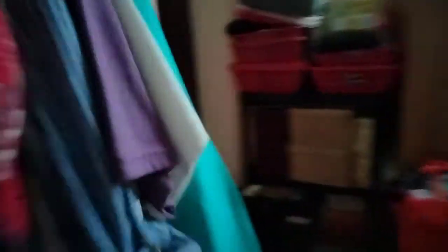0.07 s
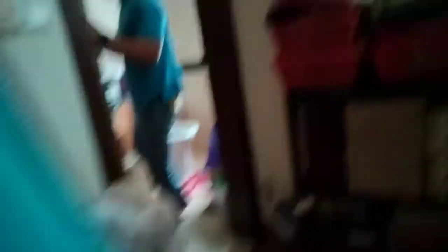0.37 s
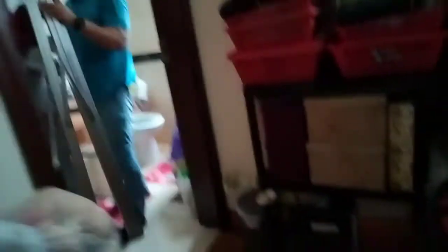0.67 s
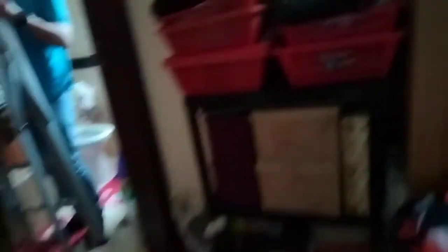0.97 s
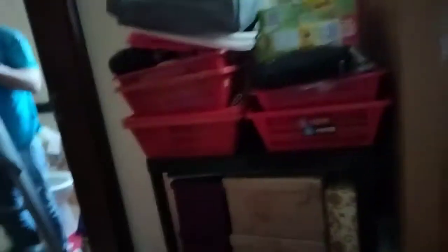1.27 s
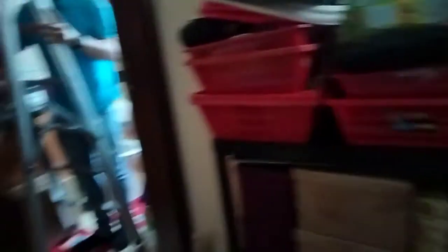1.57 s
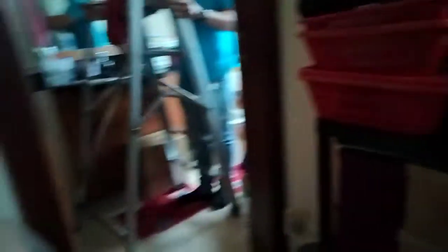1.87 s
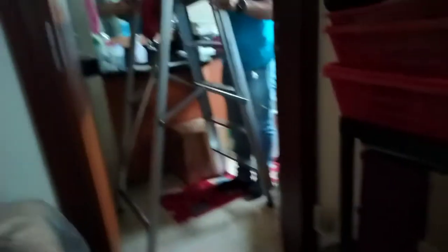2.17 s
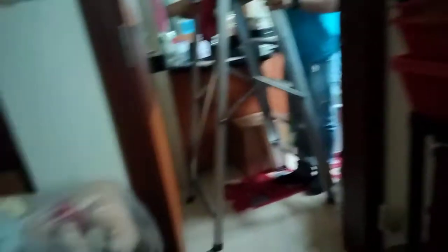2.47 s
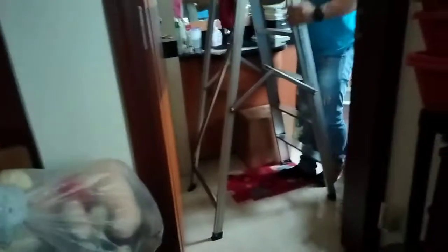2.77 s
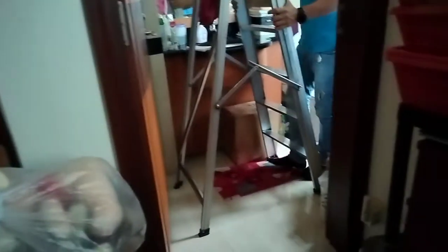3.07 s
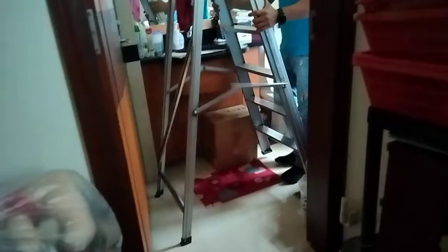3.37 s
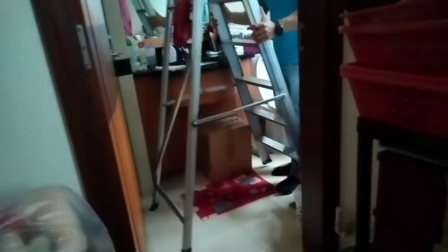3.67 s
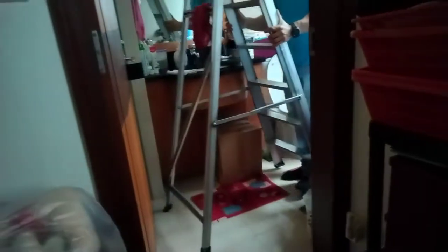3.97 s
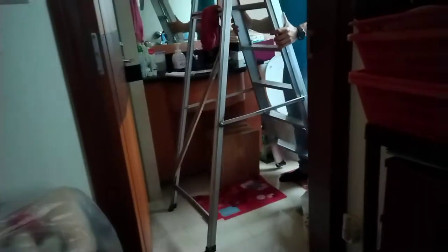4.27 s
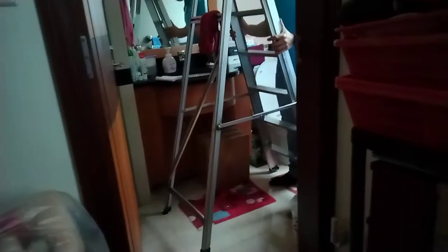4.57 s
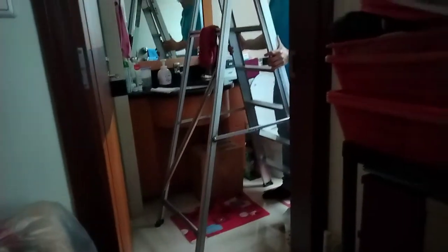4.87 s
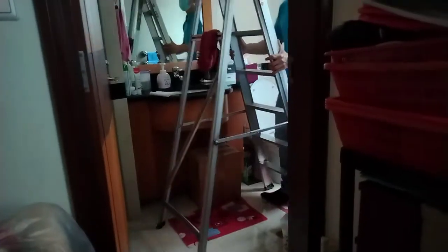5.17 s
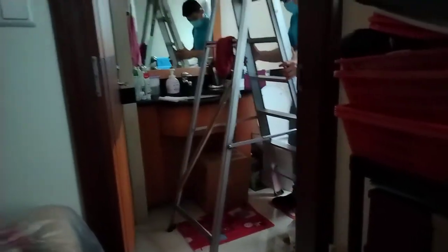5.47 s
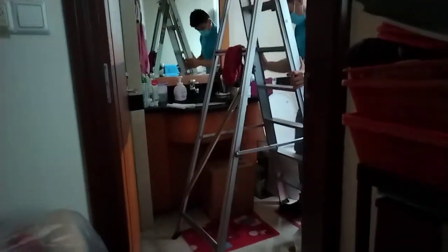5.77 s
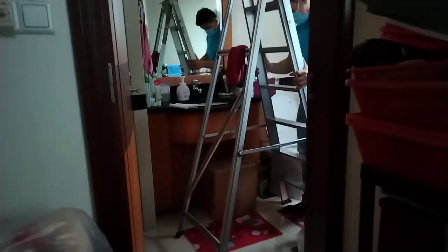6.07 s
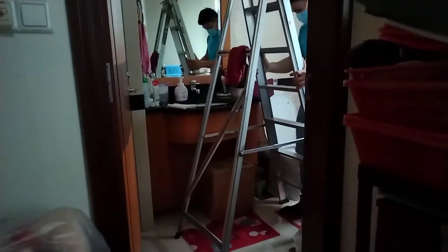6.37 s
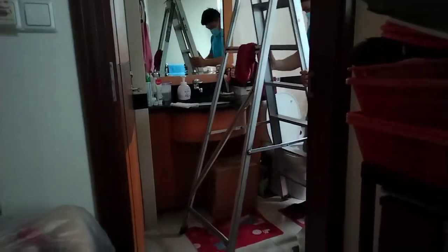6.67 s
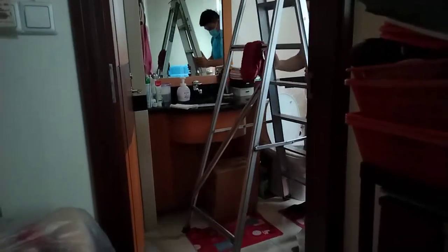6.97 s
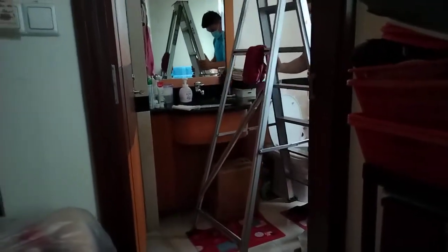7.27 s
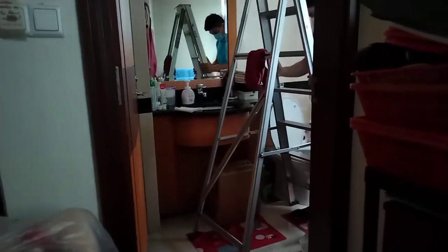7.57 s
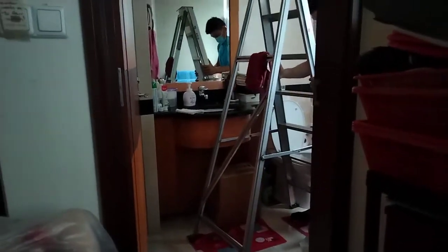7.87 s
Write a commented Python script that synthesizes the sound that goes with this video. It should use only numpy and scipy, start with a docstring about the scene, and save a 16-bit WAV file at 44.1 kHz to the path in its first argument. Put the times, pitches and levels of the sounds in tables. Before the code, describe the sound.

Inside a home with small, hard rooms, a stepladder is moved and stood up, heard through a phone in the next room. Faint finger ticks on the phone and light metal knocks come first, over a soft hiss. A loud clank and a louder burst of clattering follow, with a quiet low rush beneath. Then the ladder is nudged about in scattered knocks, each a short rattle of loose joints that rings the hollow rails.

```python
"""Over a soft household hiss, an aluminium stepladder knocks lightly as it is carried through a doorway.
Fingers tick on the phone that listens from the next room. Near 2 s a hollow low rush swells and the
ladder is set on a tiled floor; at 3.5 s it is spread open with a loud clatter. The rush dies after 4 s,
then a thin whine comes and goes while the ladder is shifted into place. Each knock is a short rattle
of loose joints that rings the hollow rails; small hard rooms smear it."""
import sys
import numpy as np
from scipy import signal
from scipy.fft import rfft, irfft
from scipy.io import wavfile

SR = 44100
rng = np.random.default_rng(int(sys.argv[2]) if len(sys.argv) > 2 else 0)


def store_wav(level_fs):
    """Save 16-bit WAV to argv[1]."""
    pcm = np.round(np.clip(np.atleast_2d(level_fs), -1, 1) * 32767)
    wavfile.write(sys.argv[1], SR, pcm.T.astype(np.int16))


N = 353108
TAIL = 24576  # samples per knock or tick
TIME_S, AGE_S = np.arange(N) / SR, np.arange(TAIL) / SR


def undb(db):
    """Decibels to gain."""
    return 10 ** (np.asarray(db) / 20)


def unit(x):
    """Scale to an energy of one."""
    return x / np.sqrt(np.sum(x ** 2) + 1e-18)


def fade(t60_s):
    """Exponential decay, 60 dB in t60_s."""
    return np.exp(-np.log(1000) * AGE_S / max(t60_s, 1e-3))


def convolve(x, response):
    """Pass a sound through an impulse response."""
    return signal.fftconvolve(x, response)[:len(x)]


def butter(x, order, hz, kind="low"):
    """Butterworth filter."""
    return signal.sosfilt(signal.butter(order, hz, kind, fs=SR, output="sos"), x)


def colour(x, points, size=4096):
    """Minimum-phase filter with the gain of (Hz, dB) points."""
    hz, db = np.transpose(points)
    bin_hz = np.fft.rfftfreq(size, 1 / SR)
    gain = undb(np.interp(np.log(bin_hz + 1), np.log(hz), db))
    cepstrum = irfft(np.log(gain))
    cepstrum[1:size // 2] *= 2
    cepstrum[size // 2 + 1:] = 0
    return convolve(x, irfft(np.exp(rfft(cepstrum))))


def waver(depth_db, rate_hz):
    """Gain that wanders randomly about one."""
    steps = rng.standard_normal(1024)
    return undb(depth_db * np.interp(TIME_S * rate_hz, np.arange(len(steps)), steps))


def noise(points):
    """Coloured noise with an rms of one."""
    return unit(colour(rng.standard_normal(N), points)) * np.sqrt(N)


def add(out, start_s, sound):
    """Mix a sound in at a time."""
    start = max(int(start_s * SR), 0)
    out[start:start + len(sound)] += sound[:max(len(out) - start, 0)]


def thin_hiss(start_db=-53.5, db_per_s=-1.5):
    """White hiss close to the microphone, sinking slowly."""
    return undb(start_db + db_per_s * TIME_S) * rng.standard_normal(N)


# Each row: frequency in Hz, relative level in dB.
HISS_SPECTRUM = [(25, -31), (70, -10.5), (200, -1), (450, 1), (700, 1.5), (1300, 3), (2000, 4),
                 (3200, -1.5), (5000, -7.5), (8000, -16.5), (16000, -17.5)]
# Each row: time in seconds, hiss level in dB.
HISS_ENVELOPE = [(0, -44.5), (.55, -54), (.8, -46), (1.2, -47.5), (2.1, -56.5), (2.38, -54), (2.62, -44.5),
                 (4.15, -44), (4.6, -48), (5.4, -44.5), (6.1, -48), (7.5, -46.5), (7.85, -52)]


def household_hiss():
    """Soft broad noise with a wavering level."""
    level_db = np.interp(TIME_S, *np.transpose(HISS_ENVELOPE))
    return noise(HISS_SPECTRUM) * undb(level_db) * waver(depth_db=0.74, rate_hz=27)


# Each row: peak time in seconds, level in dB, 1/e half-width in seconds.
WHINE_SWELLS = [(4.476, -52.5, 0.1), (5.779, -52.5, 0.096), (6.3, -46.5, 0.08), (7.033, -54, .1)]


def whine(hz=1930):
    """A narrow band of noise in brief swells."""
    band = noise([(hz * .8, -35), (hz * .94, -9), (hz, 0), (hz * 1.06, -9), (hz * 1.25, -35)])
    swells = sum(undb(db) * np.exp(-((TIME_S - peak_s) / half_s) ** 2)
                 for peak_s, db, half_s in WHINE_SWELLS)
    return band * swells * waver(depth_db=1, rate_hz=11)


# Each row: frequency in Hz, relative level in dB.
RUSH_SPECTRUM = [(40, -40.5), (160, -16.5), (250, -2.5), (400, -1), (540, 1), (640, -4.5), (1000, -15.5),
                 (3000, -43.5)]


def hollow_rush(full_db=-45, full_s=1.91, end_s=4.07, rise_db_per_s=10.5, fall_db_per_s=57.5):
    """Low noise that swells, holds and stops."""
    rise_db = rise_db_per_s * np.minimum(TIME_S - full_s, 0)
    fall_db = fall_db_per_s * np.maximum(TIME_S - end_s, 0)
    return noise(RUSH_SPECTRUM) * undb(full_db + rise_db - fall_db)


# Each row: start in seconds, relative level in dB, t60 in seconds.
FINGER_TICKS = [(0.205, -48, .017), (0.488, -40.5, 0.011), (2.155, -52.5, .12), (2.81, -50, .9)]


def fingers(top_hz=5000):
    """Fingers tick and brush on the phone's case."""
    out = np.zeros(N)
    for start_s, db, t60_s in FINGER_TICKS:
        add(out, start_s, undb(db) * fade(t60_s) * rng.standard_normal(TAIL))
    return 2 * butter(out, 1, top_hz)


def rattle(length_s, first_db, scatter_db=2.5, count=7):
    """Energy of a first contact and of the uneven strikes that close the play in the joints."""
    strikes = np.zeros(TAIL)
    when_s = length_s * (np.arange(count) + rng.random(count)) / count
    energies = undb(scatter_db * rng.standard_normal(count)) ** 2
    np.add.at(strikes, (when_s * SR).astype(int) + 1, energies)
    strikes[0] = undb(first_db) ** 2
    return strikes / strikes.sum()


def wash(strikes, response, grain_db=0):
    """Each strike hits a new spot, so responses add in energy; grain makes single echoes stand out."""
    energy = np.maximum(convolve(strikes, unit(response) ** 2), 0)
    grain = undb(grain_db * np.repeat(rng.standard_normal(TAIL // 32), 32))
    return unit(np.sqrt(energy) * grain * rng.standard_normal(TAIL))


def clatter(strikes, crack_db=-6, late_db=-25, build_s=0.0059, split_hz=3800):
    """A crack per strike, close reflections off tiles, a dull late tail from the rest of the home."""
    build = 1 - np.exp(-AGE_S / build_s)
    late = undb(late_db) * fade(t60_s=0.91)
    low = wash(strikes, build * (fade(t60_s=0.34) + late), grain_db=0.75)
    high = wash(strikes, build * fade(t60_s=0.15), grain_db=1.5)
    crack = undb(crack_db) * wash(strikes, fade(t60_s=0.028))
    return butter(low, 2, split_hz) + butter(high, 2, split_hz, "high") + crack


def ripple(x, spread_db=3, count=90):
    """The struck spot and the nearest walls give each knock its own peaks and dips."""
    hz = np.linspace(150, 12000, count)
    return colour(x, np.transpose([hz, spread_db * rng.standard_normal(count)]))


def thin_walls(t60_s=0.25, low_hz=1000, high_hz=11000, count=70):
    """Modes of the steps and thin rail walls; each knock wakes a different set."""
    lines = np.zeros(TAIL // 2 + 1, complex)
    hz = rng.uniform(low_hz, high_hz, count)
    lines[(hz * TAIL / SR).astype(int)] = np.exp(2j * np.pi * rng.random(count))
    return irfft(lines) * fade(t60_s)


# Each row: frequency in Hz, t60 in seconds, relative dB when struck at folded rails, hinge, brace.
FRAME_MODES = [ (158.2, 0.67, -12, 8.5, -8), (197, 0.51, -12, -6, 0), (262, 0.19, -18, -4.5, -32),
               (284.3, 0.4, -21, 11.5, -31.5), (337.9, 0.85, -14, -5, 7.5), (424, 0.51, 2, 4.5, 3),
               (497.4, 0.41, -22, 14, -8.5), (626, 0.41, -30, 14.5, -27.5), (692, 0.37, 7.5, 3, 10),
               (763, 0.69, 8, -9, -0.5), (1108, 0.57, -5, -25.5, 10.5), (1260, 0.28, -6, 2, 8.5),
               (1337, 0.3, 5, 5, 9), (1516, 0.13, 0, 6, 3), (1640, 0.16, -7, 4, 11),
               (1620, 0.32, 7, -37.5, -20), (1840, 0.18, 9, -37.5, -6), (1934, 0.25, 6, 11.5, -7),
               (2150, 0.33, -2, -8, 4), (2200, 0.56, -4, -21, -9), (2360, 0.25, 0, 13.5, 5.5),
               (2444, 0.28, -4, 7, -26), (2494, 0.11, -8.5, 24, -16), (2740, 0.13, -27, 16, 1),
               (3230, 0.3, -14, 8, -1), (3240, 0.18, -6, -12, 13), (3540, 0.31, -14.5, -17.5, -21.5),
               (4110, 0.14, 9, 6, 8), (4270, 0.32, 2, 11.5, -4), (4640, 0.18, -21, 7, -2),
               (5350, .4, 3, 9, -9)]


def frame(place, scatter_db=2, detune=0.003):
    """Long modes of the frame, weighted by the place of the blow."""
    ring = np.zeros(TAIL)
    for hz, t60_s, *place_db in FRAME_MODES:
        db = np.interp(place, [-1, 0, 1], place_db) + scatter_db * rng.standard_normal()
        mode = unit(np.sin(2 * np.pi * hz * AGE_S) * fade(t60_s))
        ring += rng.choice([-1, 1]) * undb(db) * mode
    pitch_ratio = 1 + detune * rng.standard_normal()  # grip and load shift the modes
    return np.interp(AGE_S * pitch_ratio, AGE_S, ring)


# Metal on metal. Each row: frequency in Hz, gain in dB.
CONTACT_SPECTRUM = [(30, -32), (80, -28.5), (150, -24), (300, -9.5), (600, -0.5), (1300, 2.5), (2500, 2),
                    (4400, -3), (7000, -12.5), (11000, -13.5), (16000, -11.5)]


def knock(bass_db, body_db, treble_db, rattle_s, place, first_db, frame_db=-11, walls_db=-8):
    """One rattle clatters through the rooms and rings the frame and its thin walls."""
    strikes = rattle(rattle_s, first_db)
    # The metal gathers energy while the joints rattle.
    gather = np.sqrt(np.cumsum(strikes)) * (1 - fade(t60_s=0.026))
    ring = undb(frame_db) * unit(frame(place) * gather)
    ring += undb(walls_db) * unit(thin_walls() * gather)
    rooms = unit(ripple(clatter(strikes)))
    contact = colour(rooms + ring, CONTACT_SPECTRUM)
    # Rubber feet give bass, bare metal gives treble.
    hardness = [(70, 0.48 * bass_db), (200, bass_db), (650, body_db), (2200, 0),
                (8000, treble_db), (15000, 1.46 * treble_db)]
    return unit(colour(contact, hardness)) * np.sqrt(0.065 * SR)  # energy of 65 ms at an rms of one


# Each row: start in seconds, level in dB, bass, body and treble in dB, rattle length in seconds,
# place (-1 folded rails, 0 hinge, 1 brace), seconds from first touch to full blow (0: no touch).
LADDER_KNOCKS = [ (0.001, -39, -8.5, 3.5, -4, 0.055, 0.97, 0.0027),
                 (0.271, -41, -20, 6, 1.5, 0.015, -1.05, 0), (0.66, -49.5, 5.5, 30, -0.5, .09, -0.63, 0),
                 (0.89, -27, -22.5, -7, -1, 0.0018, -1.3, 0.00022),
                 (0.968, -30.5, -2, -3.5, -1.5, 0.0063, -1.03, 0),
                 (1.018, -34, -8, 9.5, -8, 0.019, -0.95, 0.00052),
                 (1.064, -34.5, -25, 1, -6.5, 0.11, -1.134, 0.00047),
                 (1.288, -43, 11, 7.5, -9, 0.012, 0.72, 0), (1.466, -37, -15, 0, -9.5, 0.051, -0.5, 0.0037),
                 (1.612, -28.5, 2, 14, -10, 0.015, 0.43, .009), (1.847, -23, 29.5, 7, 1.5, 0.012, 0, 0.015),
                 (2.422, -13.5, 3.5, 0.5, 1, 0.03, 0.16, .017), (2.643, -39.5, 9.5, 2.5, 0.5, 0.0052, 0, 0),
                 (2.702, -39, -3, 9, -10, 0.018, -0.34, 0), (3.258, -36, -13, 6, -16, 0.037, 0.84, 0.022),
                 (3.477, -13, -5.5, -4, 1, 0.0016, 0.98, 0.0061),
                 (3.504, -25, -12, 14, -6, 0.0018, 0.49, 0.0015),
                 (3.561, -18, 4, 2.5, 8, 0.00305, 0.94, 0.000091),
                 (3.593, -25.5, -12, -1, -19, 0.016, 0.55, 0), (3.630, -29.5, 7, 11, 6.5, .009, 1, 0.00061),
                 (3.688, -31, 9, 2.5, -8, 0.059, 0.84, 0.00094),
                 (3.751, -23, 6.5, 0, -6, 0.004, .15, 0.0012), (3.758, -12.5, -6, 2, 5.5, 0.0017, 0.72, 0),
                 (3.999, -37, -6, 8, -9, 0.075, 0.73, 0.0006),
                 (4.136, -41.5, 21, 5, -14, 0.026, 0.69, 0.0042), (4.69, -48, -2, 10, 2, 0.06, 1, 0),
                 (4.878, -46, -1, 10, -1, .019, 0.17, 0.0018),
                 (5.224, -27.5, 5, 4.5, -4.5, .035, 0.26, .031), (5.539, -44, 13, 9, -12, 0.03, 0.38, 0),
                 (5.595, -29, 7, 4, -6, 0.052, .42, 0), (5.8, -48, -3, -24, -10, .008, 0.59, 0.0037),
                 (6.097, -46.5, 12, 5, -1, 0.011, 0.38, 0),
                 (6.500, -25.5, 7, 5.5, -11.5, 0.04, 0.34, 0.018),
                 (6.739, -31, 3.5, 3, -2.5, 0.048, 0.3, 0.012), (6.891, -48.5, -9, -8, 8, 0.00476, 0.65, 0),
                 (7.188, -25.5, 12.5, 5.5, -9.5, 0.032, 0.89, .011),
                 (7.297, -38, 10, 10.5, -1.5, 0.026, -0.37, 0.0013),
                 (7.413, -31.5, 8, 9, 1.5, 0.02, -0.095, 0.0013),
                 (7.433, -20, -1, -1.5, -2.5, 0.03, 0.196, 0.0046),
                 (7.569, -37.5, 12, 7.5, -3, 0.036, 0.41, 0.002),
                 (7.798, -48.5, 26, 12, -19, 0.018, 0.2, 0.00071),
                 (7.889, -47, 21, 9, -21, 0.023, 0.616, 0.0062)]


def ladder(touch_db=-4.5, touch_body_db=-3, touch_share=0.64):
    """All the knocks; in many, one leg or rail lands first with a lighter, thinner touch."""
    out = np.zeros(N)
    for start_s, db, bass_db, body_db, treble_db, rattle_s, place, wait_s in LADDER_KNOCKS:
        if wait_s > 0:
            touch_s = touch_share * wait_s
            touch = knock(bass_db, body_db + touch_body_db, treble_db, touch_s, place, first_db=-10)
            add(out, start_s, undb(db + touch_db) * touch)
        blow = knock(bass_db, body_db, treble_db, rattle_s, place, first_db=-1.5)
        add(out, start_s + wait_s, undb(db) * blow)
    return out


def scene(dip_db=-14, dip_at_s=0.1647, dip_half_s=0.073):
    """The ladder over the sounds of the home, in mono; both hisses dip briefly near the start."""
    dip = undb(dip_db * np.exp(-((TIME_S - dip_at_s) / dip_half_s) ** 2))
    hiss = (thin_hiss() + household_hiss()) * dip
    return (hiss + whine() + hollow_rush() + fingers() + ladder())[None]


# Microphone port resonance. Each row: frequency in Hz, gain in dB.
PORT_RESPONSE = [(5000, -2), (6000, -5.5), (6700, -7), (7400, -1.5), (8400, 8.5), (9400, -0.5), (10500, -5),
                 (12500, -7), (14200, -5), (15500, -0.5)]


def record(dry):
    """The phone's port colours the treble, the highest peaks clip, and the top is cut."""
    ceiling, top_hz = 0.88, 15900
    coloured = np.array([colour(channel, PORT_RESPONSE) for channel in dry])
    lowpass = signal.ellip(10, 0.2, 70, top_hz, fs=SR, output="sos")
    return signal.sosfilt(lowpass, np.clip(coloured, -ceiling, ceiling))


dry = scene()
out = record(dry)
store_wav(out)
```